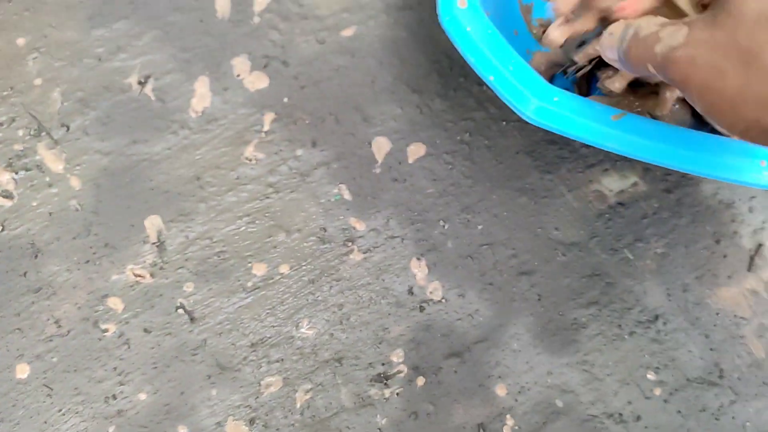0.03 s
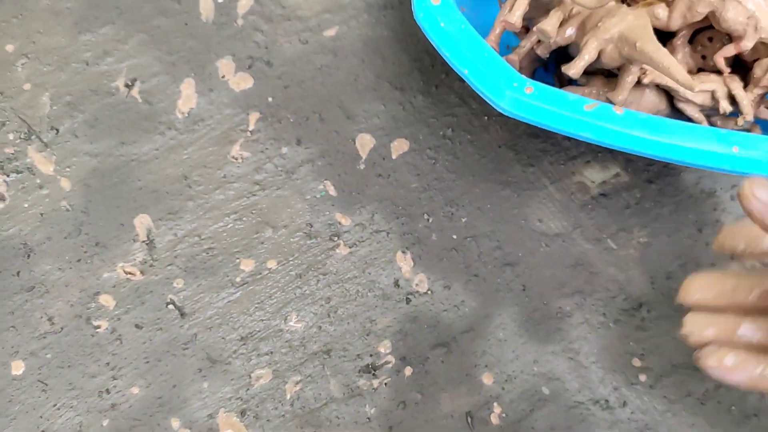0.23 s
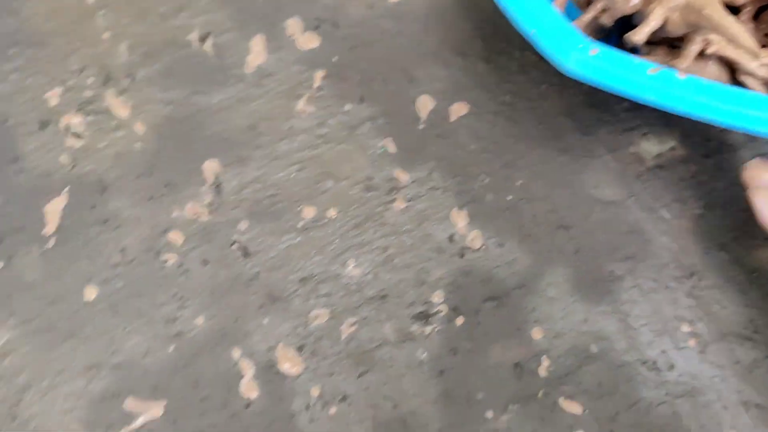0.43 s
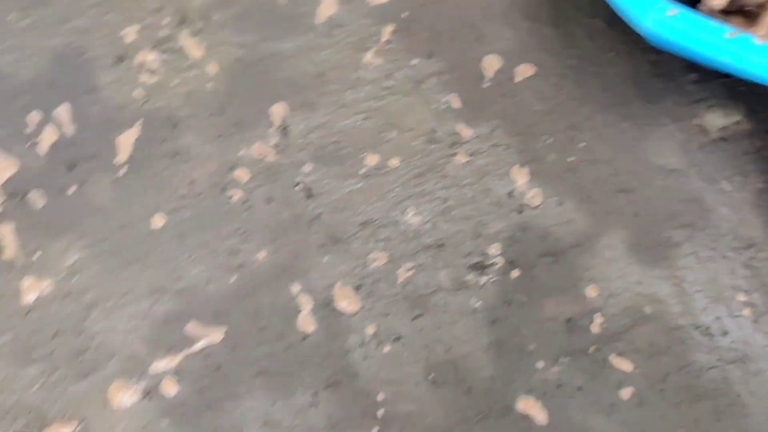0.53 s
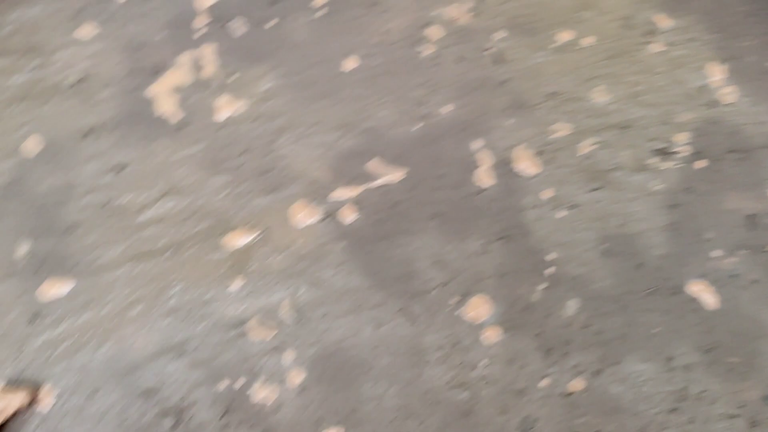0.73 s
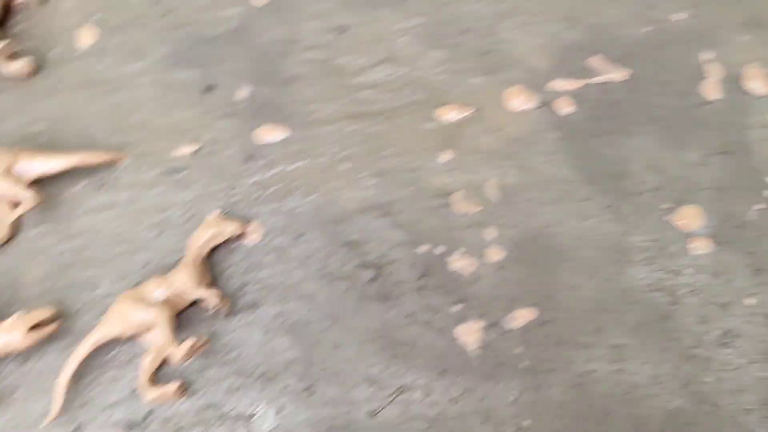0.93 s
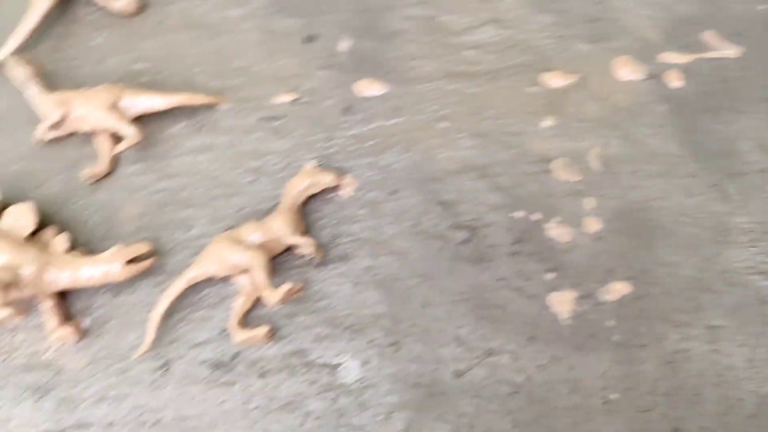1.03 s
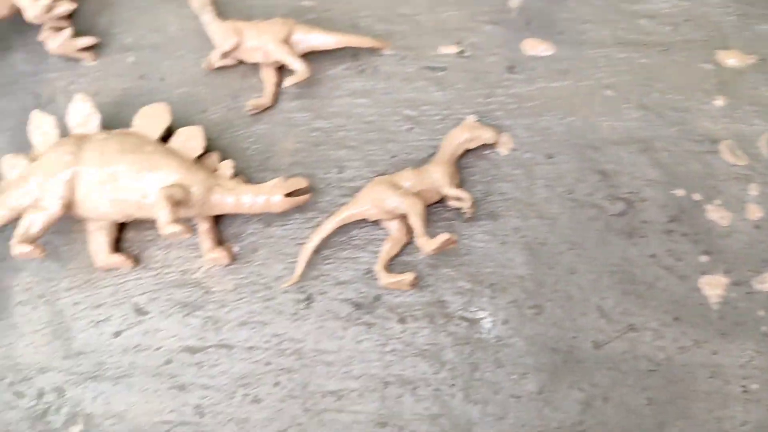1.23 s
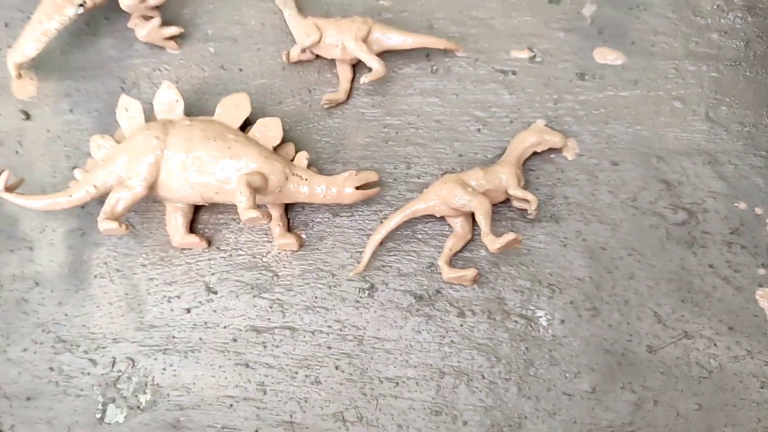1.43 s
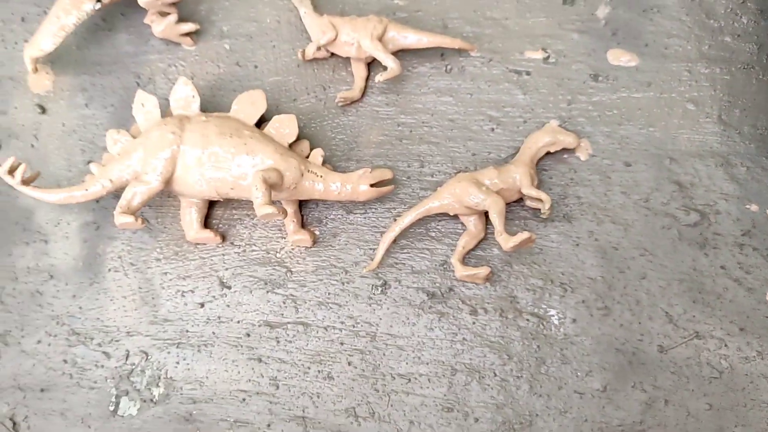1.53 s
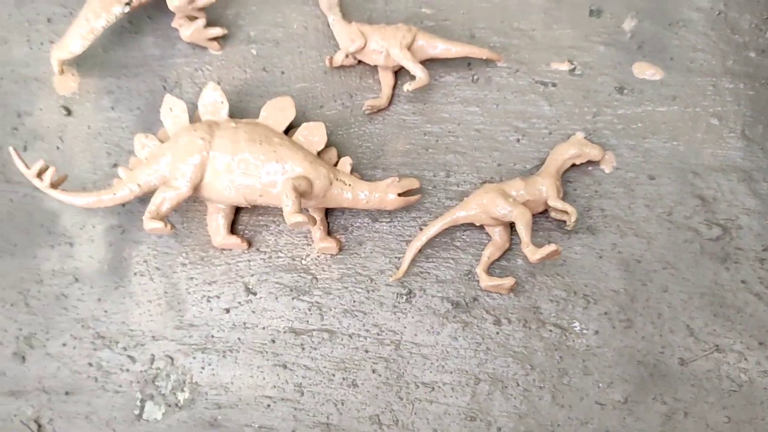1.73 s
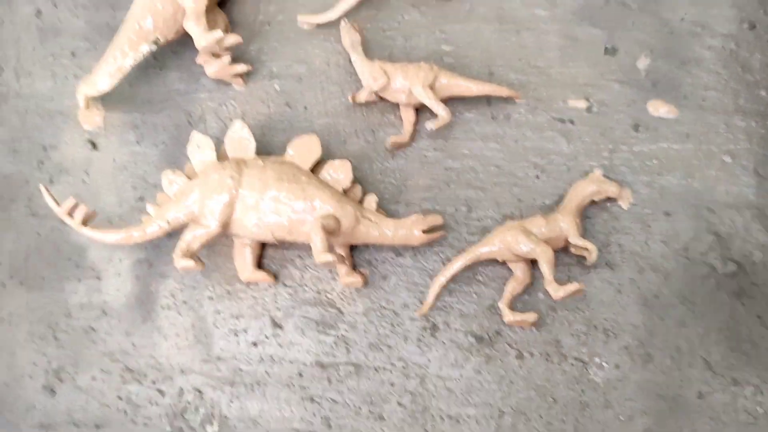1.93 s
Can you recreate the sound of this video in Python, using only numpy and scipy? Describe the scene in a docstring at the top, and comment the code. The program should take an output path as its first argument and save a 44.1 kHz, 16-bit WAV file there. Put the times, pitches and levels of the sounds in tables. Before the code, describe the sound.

Plastic toy figures clatter briefly in a tub, gritty scuffs follow, then a hollow floor knock

```python
"""A distant engine drones under hissing air and a thin chirp glides by; then hollow plastic toys clack and
rattle in a tub close to the microphones. Something scuffs over gritty concrete, and a toy thuds hollowly on
the floor. The drone is a stack of sines and the chirps are gliding sines; hits are short pushes that ring a
set of tones, often with bursts of noise; the rattle is many tiny knocks, and scuffs and air are shaped noise."""
import sys
import numpy as np
from scipy import signal
from scipy.fft import rfft, irfft, next_fast_len
from scipy.io import wavfile
from scipy.ndimage import uniform_filter1d, map_coordinates

SR = 44100
rng = np.random.default_rng(int(sys.argv[2]) if len(sys.argv) > 2 else 0)


def transcribe(signal):
    """Save signal, clipped to [-1, 1], as a 16-bit WAV file at the path in sys.argv[1]."""
    frames = np.atleast_2d(signal).T
    limited = np.clip(frames, -1, 1)
    pcm = np.round(limited * 32767).astype(np.int16)
    wavfile.write(sys.argv[1], SR, pcm)


def makeup_ratio(level_db):
    """Linear amplitude ratio for a level in decibels (20 dB per factor of ten)."""
    decades = np.asarray(level_db, float) / 20
    return 10 ** decades


N = 88200
T = np.arange(N) / SR

# Every "level per Hz" table below gives only the tone colour: the noise is scaled afterwards.
# engine lines: [multiple of the engine's base pitch, level/dB]; 4 and 10 follow ENGINE_SWELL instead
ENGINE_LINES = [(3, -60), (4, -46), (5, -54), (6, -57), (8, -55), (9, -54), (10, -45), (14, -62)]
# slow swell of the two strongest engine lines: [t/s, level of line 4/dB, level of line 10/dB]
ENGINE_SWELL = [(0.0, -44, -52), (0.07, -46.5, -50), (0.32, -49.5, -46), (0.57, -46.5, -50.5),
                (0.89, -53, -42), (1.06, -54, -57.5), (1.13, -44, -44), (1.93, -45, -41.5), (2.0, -42, -44)]
# colour of the far rumble: [f/Hz, level per Hz/dB]
RUMBLE_COLOUR = [(15, -87), (25, -42), (81, -12.5), (91, -14.5), (112, -1.5), (192, -10), (248, -3.5),
                 (284, -3.5), (310, -12.5), (407, -13.5), (900, -40), (1170, -89), (1980, -120)]
# colour of the air's hiss: [f/Hz, level per Hz/dB]
HISS_COLOUR = [(350, -7.5), (600, 3), (737, -2.5), (930, -1.5), (1010, -5.5), (1460, -5.5), (3520, -15.5),
               (4500, -14), (7600, -18.5), (8900, -13), (11300, -12), (15900, -23)]
# how alike left and right are in rumble and hiss: [f/Hz, likeness, 1 = the same, 0 = unrelated]
AIR_LIKENESS = [(60, 0.92), (180, 0.88), (550, 0.31), (1650, -0.22), (4970, 0.07), (15000, -0.12)]
# pitch paths, one list for each chirp: [t/s, f/Hz]
CHIRP_PATHS = [
    [(.02, 11400), (.035, 11650), (.06, 11500), (.09, 11250), (.1, 11950), (.116, 11200), (.15, 10650)],
    [(.415, 11000), (.44, 10150), (.47, 10400), (.5, 11050), (.525, 11700), (.555, 11000)],
    [(1.89, 11200), (1.93, 12300)],
    [(1.925, 12400), (1.975, 13400)],
    [(1.94, 11100), (1.995, 12000)],
]
# middle level of each chirp: [level/dB]
CHIRP_LEVELS = [-63.5, -66.5, -65, -65, -65]
# toys shifting: [t/s, level before a fixed lift/dB, plastic rustle against the knocks before a fixed cut/dB]
RATTLE_COURSE = [(.094, -26, -5), (.1, -38, -10.5), (0.125, -30.5, -18), (.16, -38, -15),
                 (0.184, -50.5, -36), (0.19, -32.5, -7), (0.197, -33.5, -19), (0.213, -30, -27),
                 (0.224, -28, -19.5), (0.273, -34.5, -10), (0.309, -47.5, -4.5), (0.33, -32.5, -22),
                 (0.358, -61.5, 2), (.385, -52.5, -5)]
# strength of the knocks in the tub by pitch: [f/Hz, level/dB]
TUB_COLOUR = [(88, -28), (150, 7), (325, 1.5), (602, -0.5), (941, -2), (1800, -11.5), (3300, -21.5),
              (6000, -42.5), (7800, -63), (13200, -120)]
# toy against toy: [t/s, peak of the ring/dB, crack over the ring/dB, contact/ms, left over right/dB]
CLACK_HITS = [(.098, -28, -28, 0.74, 3), (.116, -29.5, -43, 0.93, 6), (.1195, -19, -42, 0.72, 1),
              (.125, -22, -38, 1.25, 1), (.146, -28, -30, 1.14, 5), (.155, -26.5, -24, 2.35, 0),
              (.191, -12, -4, 0.22, -0.5), (.218, -11.5, 1, 0.14, -1), (0.2193, -6, -10, 0.49, 2),
              (0.2234, -23.5, -26, 0.54, 15), (.233, -35, -31, 1.2, -4), (0.255, -22, -32, 0.25, 1),
              (.275, -26, -13, 2.5, -1), (.317, -30.5, -25, 0.83, -13), (.327, -36, -14, 1.6, -2)]
# tones that ring in a toy: [f/Hz, width/Hz, level/dB]; a wide one dies sooner
TOY_TONES = [(270, 130, -13), (338, 46, -11.5), (477, 78, -6), (752, 66, 0), (962, 113, 0.5),
             (1223, 133, 2), (1392, 132, 4), (1725, 165, -3), (2130, 194, -5.5), (2540, 56, -14),
             (3300, 420, 1), (5240, 370, 7.5)]
# crack of plastic on plastic: [f/Hz, level per Hz/dB]
SNAP_COLOUR = [(880, -15), (1500, -3), (2910, -18.5), (5260, -19.5), (5920, -30), (7500, -23), (10900, -29),
               (15900, -54)]
# how long the walls' answer takes to fall by 60 dB: [f/Hz, time/s]
WALL_DECAY = [(200, 0.15), (1500, 0.32), (10000, 0.13)]
# a crack of plastic, grit underfoot, the toy's tick on the floor:
# [t/s, level/dB, body over the bright part/dB, left over right/dB]
BRIGHT_TICKS = [(0.2766, -23, -1.5, -5.5), (1.034, -41, -22, 0), (1.048, -43, -20, 0),
                (1.0613, -45, -18, 7), (1.07, -27, -22, -4), (1.0755, -33, -20, -8), (1.294, -33, -17, -2),
                (1.4738, -37.5, 6.5, 7), (1.62, -37, -3, -3)]
# colour of grit, also used for the bright ticks and the rustle of plastic: [f/Hz, level per Hz/dB]
GRIT_COLOUR = [(1180, -17), (2000, -10.5), (4220, -1.5), (5520, -7), (6560, -2.5), (7090, -13), (8740, 1.5),
               (10100, -3.5), (11500, 2), (15900, -16.5)]
# strokes on concrete: [t/s, hiss level before a fixed lift/dB, body over the hiss/dB, left over right/dB]
SCUFF_STROKES = [
    [(0.7, -82, 5, -3), (0.744, -63, -13, -4), (0.842, -57, -10, 0), (0.848, -55, -3, -0.5),
     (0.954, -47, -2.5, -1.5), (1.016, -51, -6, -3), (1.076, -46, -8, 3.5), (1.086, -50, 4, -4.5),
     (1.132, -47, -0.5, -0.5), (1.19, -59, 1, -1), (1.27, -76, -12, -1)],
    [(1.24, -73, -29, -7), (1.3, -62.5, 5.5, -3), (1.324, -59.5, -23, 2), (1.464, -66, 0, 3),
     (1.472, -56, 1, -5.5), (1.526, -41, -2.5, -1), (1.626, -39.5, 1.5, -1.5), (1.685, -61, 9.5, -2)],
    [(1.65, -55.5, 10.5, 6), (1.69, -57.5, 16, 1.5), (1.73, -56.5, 8, 3), (1.765, -55, 13.5, 1.5),
     (1.81, -60, 3.5, 5.5), (1.86, -67.5, -18, 8), (2.01, -62.5, -9, 9)],
]
# what resonates under each stroke, one list for each: [f/Hz, level per Hz/dB]
STROKE_BODIES = [
    [(400, -24), (600, -8.5), (1050, -7), (1270, 4), (1380, -7), (1500, 3.5), (1700, -7), (3000, -9.5),
     (4000, -18.5)],
    [(290, -38), (500, -7), (539, -19), (690, -14), (1250, -6.5), (1840, -13.5), (3000, -16.5), (3900, -19),
     (6600, -120)],
    [(260, -14), (450, 0.5), (1260, -12.5), (1430, -11), (2050, -18.5), (3000, -21), (3900, -23),
     (6600, -120)],
]
# lean of the grit's hiss to one side: [f/Hz, left over right/dB]
GRIT_LEAN = [(1650, 8), (4970, -6), (15000, 9)]
# brief low tone under the first stroke: [start t/s, end t/s, f/Hz, level/dB]
HOOT_TONE = (0.8, 0.93, 595.5, -51.5)
# toy against floor: [t/s, peak level/dB, contact/ms, left over right/dB]
THUD_HITS = [(1.6203, -12.5, 1.78, 9), (1.63, -15.5, 1.28, -3.5), (1.655, -29.5, 0.88, -3),
             (1.681, -25.5, 0.68, 7), (1.688, -29, 0.48, 4), (1.756, -31.5, 1.16, 9), (1.769, -34, 0.4, -2)]
# tones of the hollow toy on the floor: [f/Hz, width/Hz, level/dB]
HOLLOW_TONES = [(233, 36, 0.5), (366, 40, -0.5), (720, 50, -5.5), (796, 31, -3), (1060, 65, -11)]


def unit(x):
    """Scale to rms 1."""
    return x / np.sqrt(np.mean(x ** 2) + 1e-20)


def along(points, hz):
    """Read a table of (Hz, value) points, on a log axis of frequency."""
    f, v = np.transpose(points)
    return np.interp(np.log(hz + 1), np.log(f + 1), v)


def curves(rows):
    """One value per sample for each column after the time, and a gate that is open while the table lasts."""
    s, *cols = np.transpose(rows)
    gate = np.clip(np.minimum(T - s[0], s[-1] - T) * 100, 0, 1)  # opens and shuts in 10 ms
    return [np.interp(T, s, c) for c in cols] + [gate]


def wobble(rate):
    """A smooth random curve through so many random points a second."""
    points = rng.standard_normal(int(N * rate / SR) + 4)
    return map_coordinates(points, [T * rate])


def filtered(x, response):
    """Multiply the spectrum of x by a response of frequency."""
    m = next_fast_len(x.shape[-1] + 8192)
    spectrum = rfft(x, m) * response(np.fft.rfftfreq(m, 1 / SR))
    return irfft(spectrum, m)[..., :x.shape[-1]]


def panned(x, db):
    """Left up and right down by half of db."""
    return x * np.array([makeup_ratio(db / 2) * np.ones(N), makeup_ratio(-db / 2) * np.ones(N)])


def rush(colour, alike, per_s=0, spread_db=0, patchy_db=1.5):
    """Stereo noise of rms 1 with patches of random gain; with per_s it is made of grains of uneven size."""
    pair = rng.standard_normal((2, N))
    if per_s:
        grains = rng.random((2, N)) < per_s / SR
        pair = pair * grains * makeup_ratio(spread_db * rng.exponential(size=(2, N)))
    z = signal.stft(pair, nperseg=384)[2]
    patches = uniform_filter1d(rng.standard_normal(z.shape[1:]), size=10, axis=0)
    patches = uniform_filter1d(patches, size=3, axis=1)
    pair = signal.istft(z * makeup_ratio(patchy_db * unit(patches)), nperseg=384)[1][:, :N]

    def mid_and_side(hz):
        # the balance of middle and side sets how alike left and right are
        turn = np.arccos(np.clip(along(alike, hz), -1, 1)) / 2
        return makeup_ratio(along(colour, hz)) * [np.cos(turn), np.sin(turn)]

    mid, side = filtered(pair, mid_and_side)
    return unit(np.array([mid + side, mid - side]))


def add(out, s, sound, pan_db):
    """Place a stereo sound at time s."""
    start = round(s * SR)
    placed = sound * makeup_ratio(np.array([[pan_db], [-pan_db]]) / 2)
    out[:, start:][:, :sound.shape[1]] += placed[:, :N - start]


def ring(modes, contact_ms):
    """A smooth push of the contact's length rings fading tones, altered a little at each hit; peak 1."""
    scatter_db, rise_s, bass_cut_hz = 2, .0006, 74
    t = T[:SR // 8]
    draws = rng.standard_normal((len(modes), 3))
    push = np.sin(np.pi * np.clip(t * 1000 / max(contact_ms, .05), 0, 1)) ** 2
    bell = np.zeros((2, len(t)))
    for (hz, width, db), (u, v, side) in zip(modes, draws):
        # higher tones are more out of step between the microphones
        phase = hz / 2500 * (v + 2 * side * np.array([[.6], [-.6]]))
        fade = np.exp(-np.pi * width * t)
        bell += makeup_ratio(db + scatter_db * u) * fade * np.sin(2 * np.pi * hz * t + phase)
    bell = bell * (1 - np.exp(-t / rise_s))
    sound = signal.fftconvolve(bell, push[None], axes=1)[:, :len(t)]
    sound = filtered(sound, lambda hz: (1j * hz / (bass_cut_hz + 1j * hz)) ** 2)
    return sound / np.abs(sound).max()


def crack(t60, colour):
    """A burst of noise, different at each microphone, that falls by 60 dB in t60 seconds."""
    t = T[:SR // 8]
    noise = filtered(rng.standard_normal((2, len(t))), lambda hz: makeup_ratio(along(colour, hz)))
    return unit(noise) * 0.48 * makeup_ratio(-60 * t / t60)


def engine():
    """Multiples of a slightly unsteady engine's pitch, each wavering; the two strongest swell slowly."""
    base_hz, drift = 27.9, 0.0062  # drift is a share of the pitch
    others_db, waver_db = -4.5, 4  # for all lines but the two strongest
    phase = 2 * np.pi * np.cumsum(base_hz * (1 + drift * wobble(3.64))) / SR
    low_db, high_db, _ = curves(ENGINE_SWELL)
    out = np.zeros((2, N))
    for k, db in ENGINE_LINES:
        if k == 4:
            level_db = low_db
        elif k == 10:
            level_db = high_db
        else:
            level_db = db + others_db + waver_db * wobble(7)
        level = 2 ** .5 * makeup_ratio(level_db + 0.94 * wobble(23.0))  # root 2 makes the level an rms one
        ear_shift = np.array([[0], [0.035 * k]])
        out += level * np.sin(k * phase + rng.uniform(0, 2 * np.pi) + ear_shift)
    return out


def air():
    """Far rumble and a smooth hiss, both of shaped noise whose level wavers slightly."""
    rumble = makeup_ratio(-44.5 + 0.3 * wobble(6.7)) * rush(RUMBLE_COLOUR, AIR_LIKENESS)
    hiss = makeup_ratio(-58.5 + 0.7 * wobble(4.44)) * rush(HISS_COLOUR, AIR_LIKENESS)
    return rumble + hiss


def chirps():
    """Thin gliding whistles, perhaps an insect: sines of rough pitch and wavering level."""
    rough_hz, waver_db = 95, 3.5
    out = np.zeros(N)
    for rows, db in zip(CHIRP_PATHS, CHIRP_LEVELS):
        hz, gate = curves(rows)
        level = gate * makeup_ratio(db + waver_db * wobble(76))
        out += level * np.sin(2 * np.pi * np.cumsum(hz + rough_hz * wobble(660)) / SR)
    return out


def rattle():
    """Many small knocks, each with its own pitch and place; wet plastic rustles above them."""
    knock_cycles = 4.9  # a larger number lets each knock ring longer
    db, rustle_db, gate = curves(RATTLE_COURSE)
    start = RATTLE_COURSE[0][0]
    length = RATTLE_COURSE[-1][0] - start
    t = T[:SR // 30]
    knocks = np.zeros((2, N))
    for when, pitch, side, size in rng.random((1100, 4)):
        hz = 150 * 40 ** pitch  # 150 to 6000 Hz
        ear_shift = side * np.array([[0], [hz / 500]])
        swell = t * hz * np.exp(-t * hz * 5 / knock_cycles)
        tone = np.sin(2 * np.pi * hz * t + ear_shift) * swell
        level = hz * makeup_ratio(along(TUB_COLOUR, hz) + 4.0 * size)
        add(knocks, start + when * length, tone * level, 12 * (side - .5))
    knocks = knocks / np.sqrt(np.mean(knocks[:, gate > 0] ** 2))
    rustle = makeup_ratio(rustle_db - 4.0) * rush(GRIT_COLOUR, [(5000, 0.083)])
    return gate * makeup_ratio(db + 1.5) * (knocks + rustle)


def clacks():
    """Toys knock together in the tub: each contact rings the plastic and adds a crack of noise."""
    out = np.zeros((2, N))
    for s, db, crack_db, ms, pan_db in CLACK_HITS:
        hit = ring(TOY_TONES, ms) + makeup_ratio(crack_db) * crack(0.013, SNAP_COLOUR)
        add(out, s, makeup_ratio(db) * hit, pan_db)
    return out


def walls(x):
    """The walls answer 150 samples late with a noise tail; each frequency dies at its own speed."""
    hz, t, z = signal.stft(rng.standard_normal((2, SR // 2)), SR, nperseg=256)
    fade = makeup_ratio(-60 * t / along(WALL_DECAY, hz)[:, None])
    tail = signal.istft(z * fade, SR, nperseg=256)[1]
    late = np.pad(x, ((0, 0), (150, 0)))
    return signal.fftconvolve(late, tail / np.linalg.norm(tail[0]), axes=1)[:, :N]


def bright_ticks():
    """A crack of plastic, grit underfoot and the toy's tick on the floor: bright noise with a duller body."""
    t60 = 0.016  # s
    out = np.zeros((2, N))
    for s, db, body_db, pan_db in BRIGHT_TICKS:
        tick = crack(t60, GRIT_COLOUR) + makeup_ratio(body_db) * crack(t60, STROKE_BODIES[1])
        add(out, s, makeup_ratio(db) * tick, pan_db)
    return out


def scuffs():
    """Fine grit hisses under each stroke as a spray of noise grains, with a duller body below."""
    out = np.zeros((2, N))
    for rows, colour in zip(SCUFF_STROKES, STROKE_BODIES):
        db, body_db, pan_db, gate = curves(rows)
        hiss = rush(GRIT_COLOUR, [(5000, 0.024)], per_s=12000, spread_db=1.4, patchy_db=2.4)
        hiss = hiss * makeup_ratio(1.5 * wobble(60.74))  # a fast stutter
        hiss = filtered(hiss, lambda hz: makeup_ratio(along(GRIT_LEAN, hz) * np.array([[.5], [-.5]])))
        body = rush(colour, [(1000, 0.04)], patchy_db=3.2) * makeup_ratio(body_db)
        out += panned(gate * makeup_ratio(db + 2.0) * (hiss + body), pan_db)
    return out


def hoot():
    """A soft sine, wavering in pitch and level, that swells and fades."""
    start, end, hz, db = HOOT_TONE
    swell = np.sin(np.pi * np.clip((T - start) / (end - start), 0, 1))
    phase = 2 * np.pi * np.cumsum(hz + 30 * wobble(60)) / SR
    return makeup_ratio(db + 2.5 * wobble(38.8)) * swell * np.sin(phase)


def thuds():
    """A toy lands on the floor: each contact rings its low, hollow tones."""
    out = np.zeros((2, N))
    for s, db, ms, pan_db in THUD_HITS:
        add(out, s, makeup_ratio(db) * ring(HOLLOW_TONES, ms), pan_db)
    return out


def scene():
    """Near toys in a hard room, over the drone; only the hits and ticks get an answer from the walls."""
    hits = clacks() + bright_ticks() + thuds()
    room = makeup_ratio(-14) * walls(hits)
    return engine() + air() + chirps() + rattle() + hits + room + scuffs() + hoot()


def roll_off(x):
    """The treble ends steeply here."""
    return signal.sosfilt(signal.butter(12, 16040, fs=SR, output="sos"), x)


def record(dry):
    """The microphones lose the deep bass, and everything from 16 kHz up is cut."""
    mix = filtered(dry, lambda hz: (hz < 16000) * 1j * hz / (45 + 1j * hz))
    return roll_off(mix)


dry = scene()
out = record(dry)
transcribe(out)
```